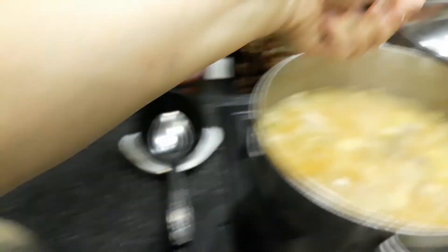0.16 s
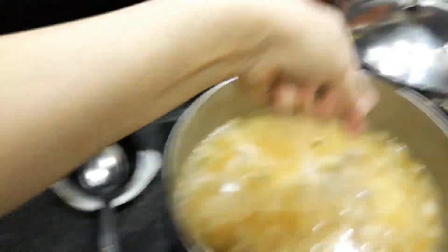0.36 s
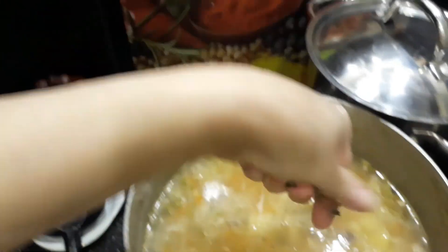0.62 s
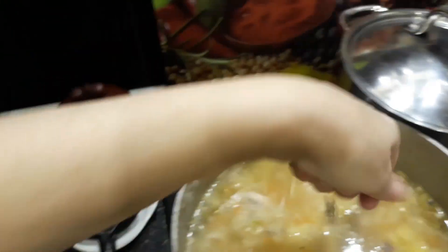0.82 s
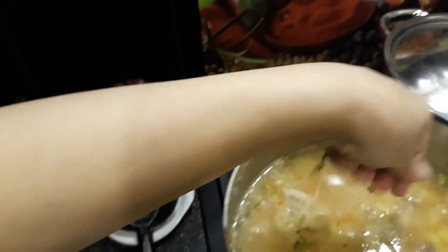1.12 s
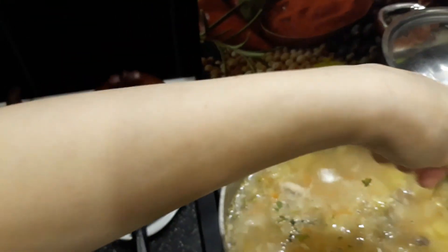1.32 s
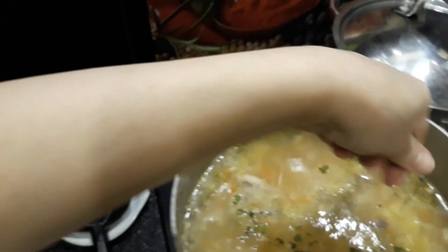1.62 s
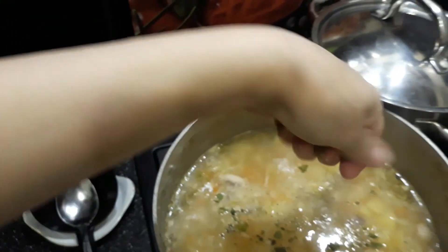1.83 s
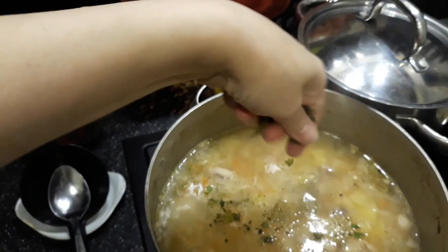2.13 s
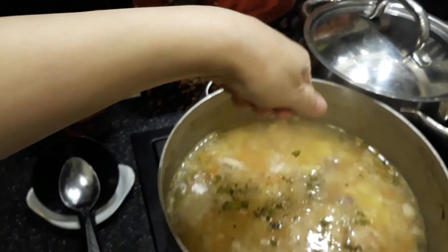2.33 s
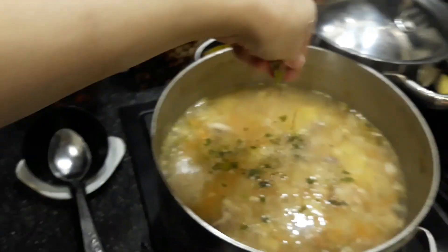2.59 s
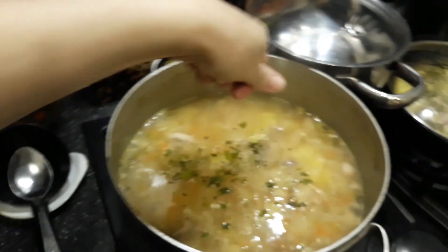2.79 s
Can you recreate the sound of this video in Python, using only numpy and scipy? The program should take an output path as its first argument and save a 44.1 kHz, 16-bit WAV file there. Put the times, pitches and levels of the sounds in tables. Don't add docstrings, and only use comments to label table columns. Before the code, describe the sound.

Dried herbs are rubbed and crumbled between fingers, close and bright. Faint rustling begins around 0.2 s, grows by 0.5 s, then runs in uneven scratchy strokes, several per second, strongest about 1.0 to 1.7 s. Tiny stems tick throughout, with one sharp snap near 1.95 s and a cluster around 2.7 s, before the rustle fades. Very faint gas hiss, low hum and barely audible soft knocks lie underneath.

```python
import sys
import numpy as np
from scipy import signal
from scipy.fft import rfft, irfft, next_fast_len
from scipy.io import wavfile
from scipy.ndimage import uniform_filter1d

SR = 44100
rng = np.random.default_rng(int(sys.argv[2]) if len(sys.argv) > 2 else 0)


def log_audio(samples):
    frames = np.atleast_2d(samples).T
    limited = np.clip(frames, -1, 1)
    pcm = np.round(limited * 32767).astype(np.int16)
    wavfile.write(sys.argv[1], SR, pcm)


def amplitude_ratio(level_db):
    exponent = np.asarray(level_db, float) / 20
    return 10 ** exponent


N = 130095
T_S = np.arange(N) / SR


def rms_one(x):
    return x / np.sqrt(np.mean(x ** 2) + 1e-20)


def drift(rate_hz):
    r = np.exp(-16 * np.pi * rate_hz / SR)
    slow = signal.lfilter([1], [1, -2 * r, r * r], rng.standard_normal(N // 8 + 4002))
    slow = rms_one(slow[4000:])
    return np.interp(np.arange(N) / 8, np.arange(len(slow)), slow)


def resonance(x, hz, width_hz):
    r = np.exp(-np.pi * width_hz / SR)
    zeros = np.array([1, 0, -1]) * (1 - r * r) / 2
    poles = [1, -2 * r * np.cos(2 * np.pi * hz / SR), r * r]
    return signal.lfilter(zeros, poles, x + 1e-18)


def double_resonance(x, hz, width_hz):
    return resonance(resonance(x, hz, width_hz * 1.5), hz, width_hz * 1.5)


def coloured(x, spectrum, patchy_db):
    hz, db = np.transpose(spectrum)
    edges_hz = 22 * 2 ** np.arange(0, 9.7, 1 / 3)
    out = 0
    for k, (low, high) in enumerate(zip(edges_hz, edges_hz[1:])):
        band = signal.sosfilt(signal.butter(2, [low, high], "band", fs=SR, output="sos"), x)
        level_db = np.interp(np.log(low * high) / 2, np.log(hz), db)
        sign = (-1) ** k
        out = out + sign * band * amplitude_ratio(level_db + patchy_db * drift(14.37))
    return rms_one(out)


# (frequency [Hz], density [dB per Hz])
HUM_SPECTRUM = [(40, -12), (65, -2), (135, 1), (200, -11.5), (400, -17), (1000, -18), (3000, -25.5),
                (15000, -22)]
HUM_DB, FADE_IN_S = -65, 0.101
JET_HZ, JET_WIDTH_HZ, JET_DB = 1356.5, 90, -74.5


def stove():
    hum = amplitude_ratio(HUM_DB) * coloured(rng.standard_normal(N), HUM_SPECTRUM, patchy_db=2.0)
    jet = rms_one(double_resonance(rng.standard_normal(N), JET_HZ, JET_WIDTH_HZ))
    jet = jet * amplitude_ratio(JET_DB + 1.9 * drift(4.9))
    fade = np.clip(.5 + T_S / FADE_IN_S / 2, 0, 1)
    return (hum + jet) * fade


FLAKES_PER_S, FLAKE_SPREAD_DB = 12000, 3.6


def crackle(clump):
    size_db = FLAKE_SPREAD_DB * np.minimum(rng.exponential(1, N), 4.5)
    clicks = amplitude_ratio(size_db) * rng.choice([-1, 1], N)
    cracked = rng.random(N) < FLAKES_PER_S / SR
    return rms_one(clicks * cracked * clump)


# (time [s], favoured pitch [Hz], ring against stroke [dB])
HAND_SHAPES = [(0, 1900, -18), (.26, 1650, -13), (.43, 1967, -11.5), (.52, 2520, -11.5), (.66, 1960, -13),
               (.86, 2050, -9.5), (.96, 2550, -10), (1.02, 2800, -14), (1.24, 1970, -9), (1.34, 2064, -6.5),
               (1.47, 2550, -9), (1.56, 2900, -12), (1.69, 2650, -12), (1.77, 1980, -9), (1.94, 2550, -10),
               (2.0, 2880, -12), (2.23, 2450, -14.5), (2.29, 2100, -14), (2.37, 2450, -12),
               (2.48, 2650, -10), (2.7, 2500, -13), (2.79, 2100, -10)]
# (frequency [Hz], width [Hz], level [dB])
AIR_HOLLOWS = [(1650, 220, -3), (1970, 220, 0.8), (2480, 200, -.6), (2700, 230, -1.5), (2980, 330, 1.2)]
RESHAPE_S = .08
PALM_REACH_HZ, PALM_LEAK_DB, PALM_FLICKER_DB = 280, -10, 1.9


def palm(x):
    s, pitch_hz, db = np.transpose(HAND_SHAPES)
    held = np.searchsorted(s, T_S, side="right") - 1
    shape = np.array([pitch_hz[held], db[held]])
    favoured_hz, ring_db = uniform_filter1d(shape, int(RESHAPE_S * SR), axis=1)
    out = 0
    for hz, width_hz, level_db in AIR_HOLLOWS:
        share = np.exp(-((favoured_hz - hz) / PALM_REACH_HZ) ** 2) + amplitude_ratio(PALM_LEAK_DB)
        ring = double_resonance(x, hz, width_hz) * np.sqrt(SR / width_hz) / 2
        out = out + share * ring * amplitude_ratio(level_db + PALM_FLICKER_DB * drift(12))
    return out * amplitude_ratio(ring_db)


# (peak time [s], level [dB], rise [s per 10 dB], fall [s per 10 dB])
FINGER_STROKES = [(.13, -64, .12, .1), (.19, -52.5, .015, 0.09), (.27, -52.5, 0.0681, 0.01),
                  (.34, -46.5, 0.0816, 0.11), (0.466, -38.5, 0.0288, 0.0672), (0.556, -41, 0.0354, 0.0314),
                  (.68, -43, 0.0526, 0.0964), (.78, -44, 0.1113, 0.2546), (0.997, -37, 0.0275, 0.0377),
                  (1.098, -36.5, 0.0742, 0.1053), (1.201, -39, 0.0821, 0.0853), (1.29, -40.5, 0.103, 0.02),
                  (1.431, -44.5, 0.11, 0.1947), (1.491, -37, 0.0537, 0.0375), (1.614, -35, 0.054, 0.1041),
                  (1.702, -40.5, 0.0106, 0.0574), (1.753, -39, 0.0126, 0.0532),
                  (1.821, -46, 0.0971, 0.1674), (1.989, -40, 0.0973, 0.0723), (2.099, -37.5, 0.0483, 0.11),
                  (2.204, -39, 0.0484, 0.0991), (2.291, -46.5, 0.1722, 0.11), (2.512, -40.5, 0.0632, 0.08),
                  (2.632, -46.5, 0.0589, 0.0728), (2.69, -37, 0.0644, 0.1067), (2.758, -42, 0.0814, 0.0137),
                  (2.93, -56, 0.31, 0.71)]
# (frequency [Hz], density [dB per Hz])
RUSTLE_SPECTRUM = [(900, -35), (2250, -26), (3400, -23), (5500, -9.5), (7500, -6.5), (10500, -7),
                   (13000, -5.5), (15700, -4.5)]
RUSTLE_DB, RUSTLE_PATCHY_DB = -.5, 1.9
CLUMP_DB, CLUMPS_PER_S = 1.3, 150
UPPER_HZ, UPPER_WIDTH_HZ, UPPER_DB = 4300, 900, -11.5
PALM_FOLLOWS, MEAN_STROKE_DB, PALM_DB = .7, -43, -1.2


def flakes():
    power = 0
    for s, db, rise, fall in FINGER_STROKES:
        power = power + amplitude_ratio(2 * db - 20 * np.maximum((s - T_S) / rise, (T_S - s) / fall))
    pressure = np.sqrt(power) * amplitude_ratio(RUSTLE_DB)
    clump = amplitude_ratio(CLUMP_DB * drift(CLUMPS_PER_S))

    rustle = coloured(crackle(clump), RUSTLE_SPECTRUM, RUSTLE_PATCHY_DB)
    upper = rms_one(double_resonance(crackle(clump), UPPER_HZ, UPPER_WIDTH_HZ))
    upper = upper * amplitude_ratio(UPPER_DB + 1.5 * drift(9)) * np.clip(T_S / .4, 0, 1)

    palm_drive = amplitude_ratio(MEAN_STROKE_DB + PALM_DB) * (pressure / amplitude_ratio(MEAN_STROKE_DB)) ** PALM_FOLLOWS
    palm_drive = palm_drive * np.clip(T_S / .3, 0, 1)
    return pressure * (rustle + upper) + palm_drive * palm(crackle(clump))


# (time [s], peak level [dB], pitch [Hz])
STEM_SNAPS = [(0.1386, -35.5, 15200), (0.1841, -35.5, 8700), (0.2081, -34, 15200), (0.2743, -23.5, 13000),
              (0.4609, -28.5, 8750), (0.5493, -28.5, 9140), (1.035, -22.5, 9300), (1.1226, -20, 15850),
              (1.1608, -23.5, 14700), (1.1792, -22, 15500), (1.2394, -26, 8660), (1.2764, -30, 4320),
              (1.4242, -30, 15300), (1.8332, -25, 4020), (1.9446, -8.5, 15080), (1.9924, -28, 8350),
              (2.2224, -27, 7660), (2.2644, -27, 8410), (2.4791, -30, 4490), (2.5103, -27.5, 4660),
              (2.6808, -24, 8340), (2.7044, -23, 14000), (2.7104, -24, 15700), (2.7207, -18.5, 8680),
              (2.7264, -22, 8760), (2.7584, -24.5, 15500), (2.7704, -28, 7900)]
SNAP_CYCLES, SNAP_RING_DB, SNAP_CLICK_DB, SNAP_PALM_DB = 5.0, -3.5, -2.5, -5
SNAP_RISE_S, SNAP_CUT_HZ = .0003, 4200
CRUMB_DB, CRUMB_S = -13, .0014


def snaps():
    out, clicks = np.zeros(N), np.zeros(N)
    n = np.arange(-40, 500)
    t = n / SR
    for s, db, hz in STEM_SNAPS:
        i = int((s + .0012) * SR)
        clicks[i] = amplitude_ratio(db + SNAP_CLICK_DB)
        loss_db = np.where(n < 0, -20 * t / SNAP_RISE_S, 60 * t * hz / SNAP_CYCLES)
        ring = amplitude_ratio(SNAP_RING_DB - loss_db) * np.sin(2 * np.pi * hz * t)
        crumbs = (n > 0) * rng.standard_normal(len(n)) * amplitude_ratio(CRUMB_DB - 20 * t / CRUMB_S)
        out[i + n] += amplitude_ratio(db) * (ring + crumbs)
    high_pass = signal.butter(3, SNAP_CUT_HZ, "high", fs=SR, output="sos")
    bright = signal.sosfilt(high_pass, out + clicks + 1e-18)
    return bright + palm(clicks) * amplitude_ratio(SNAP_PALM_DB)


# (time [s], level [dB], pitch [Hz], length [s])
HAND_KNOCKS = [
    (.3, -69, 280, .06),
    (1.275, -69, 550, .06),
    (1.74, -66, 140, .06),
]


def knocks():
    out = np.zeros(N)
    for s, db, hz, length_s in HAND_KNOCKS:
        puff = rms_one(resonance(rng.standard_normal(N), hz, hz * .6))
        out += amplitude_ratio(db) * puff * np.exp(-((T_S - s) / length_s * 2) ** 2)
    return out


SIDE_DB, SIDE_CUT_HZ = -92, 130


def scene():
    mid = stove() + flakes() + snaps() + knocks()
    low_pass = signal.butter(1, SIDE_CUT_HZ, fs=SR)
    side = amplitude_ratio(SIDE_DB) * rms_one(signal.lfilter(*low_pass, rng.standard_normal(N)))
    return np.array([mid + side, mid - side])


def band_limit(x):
    return signal.sosfilt(signal.butter(12, 16850, fs=SR, output="sos"), x)


MIC_HZ, MIC_WIDTH_HZ, MIC_GAIN = 8800, 1200, 0.847
EDGE_HZ, EDGE_WIDTH_HZ, EDGE_GAIN = 15700, 1300, .8
TOP_HZ, SNAP_TOP_HZ, WIDE_OPEN_DB = 15760, 16800, -21


def record(dry):
    x = dry + MIC_GAIN * resonance(dry, MIC_HZ, MIC_WIDTH_HZ)
    x = x + EDGE_GAIN * resonance(dry, EDGE_HZ, EDGE_WIDTH_HZ)
    size = next_fast_len(N)
    hz = np.arange(size // 2 + 1) * SR / size
    x = irfft(rfft(x, size) * (hz < SNAP_TOP_HZ), size)[:, :N]
    top = irfft(rfft(x, size) * (hz > TOP_HZ), size)[:, :N]
    passed = np.zeros(N)
    for s, db, pitch_hz in STEM_SNAPS:
        if db > WIDE_OPEN_DB and pitch_hz > 12000:
            passed += np.exp(-((T_S - s - .001) / .002) ** 2)
    return band_limit(x - top * (1 - passed))


dry = scene()
out = record(dry)
log_audio(out)
```